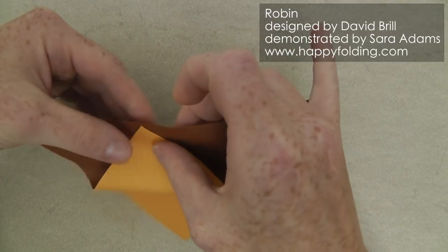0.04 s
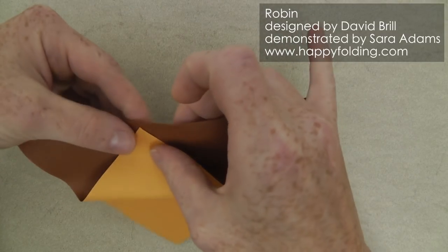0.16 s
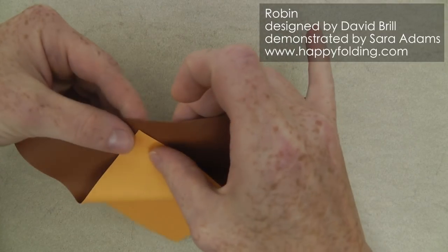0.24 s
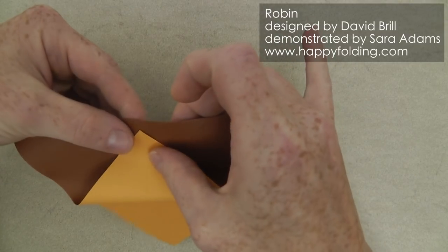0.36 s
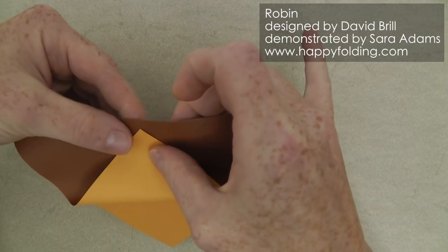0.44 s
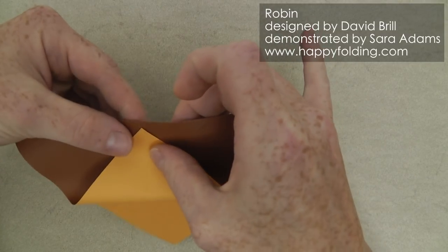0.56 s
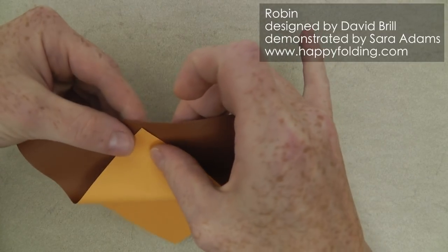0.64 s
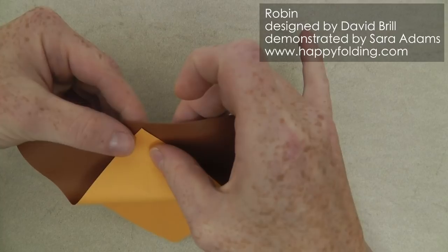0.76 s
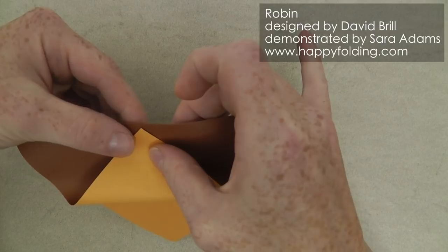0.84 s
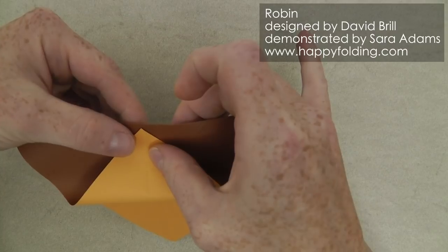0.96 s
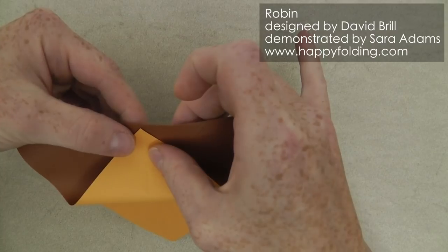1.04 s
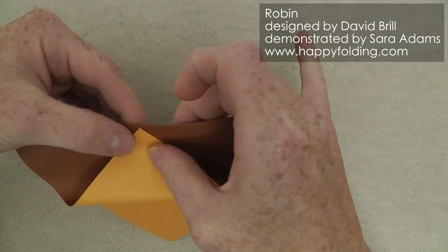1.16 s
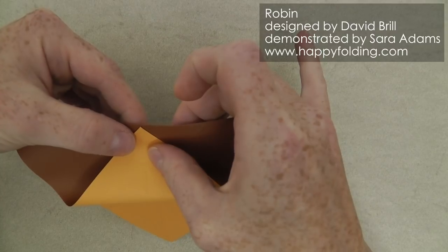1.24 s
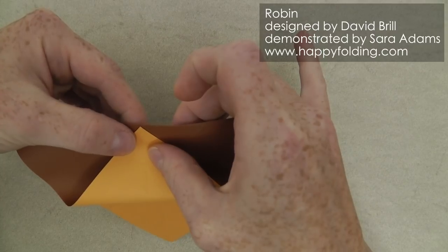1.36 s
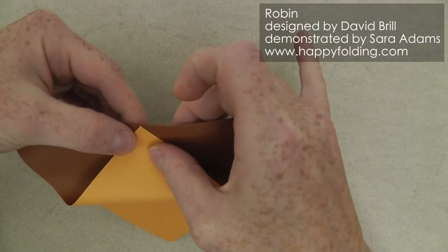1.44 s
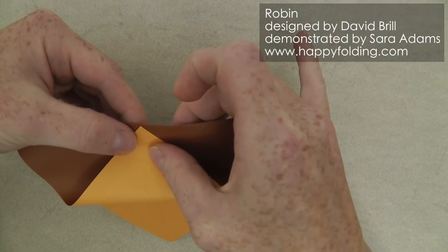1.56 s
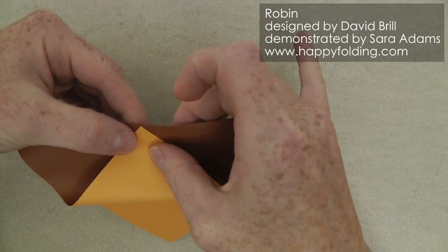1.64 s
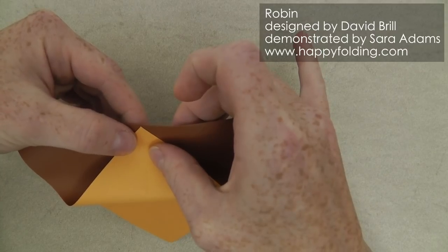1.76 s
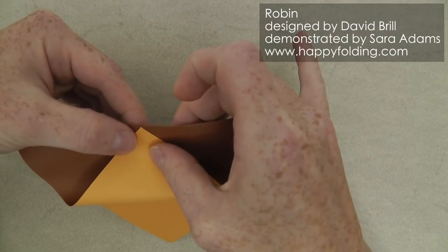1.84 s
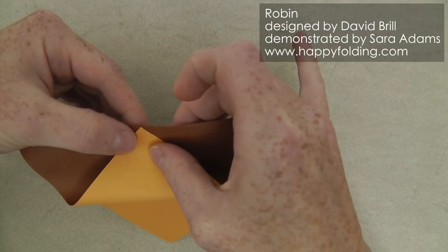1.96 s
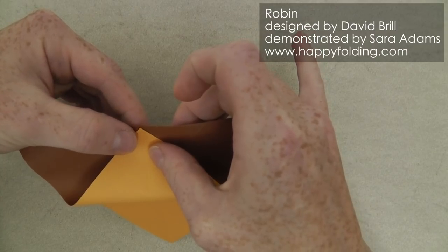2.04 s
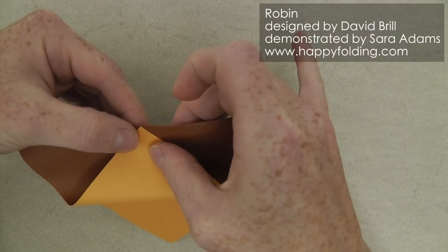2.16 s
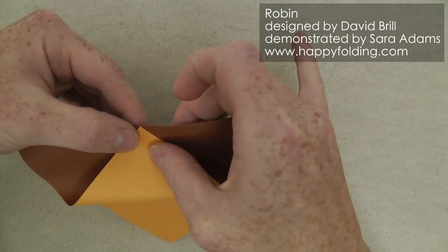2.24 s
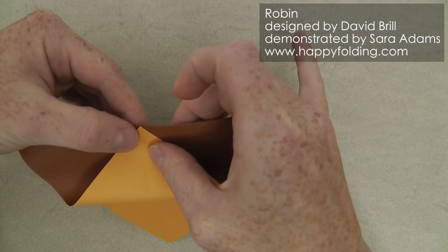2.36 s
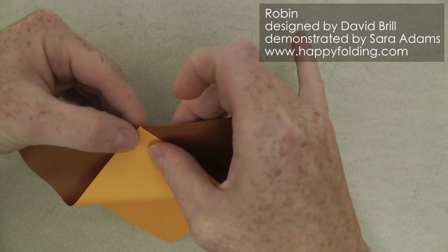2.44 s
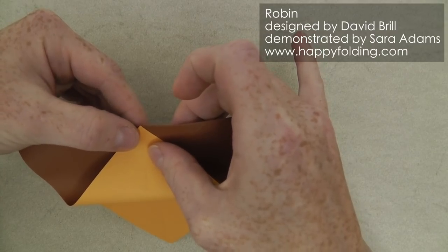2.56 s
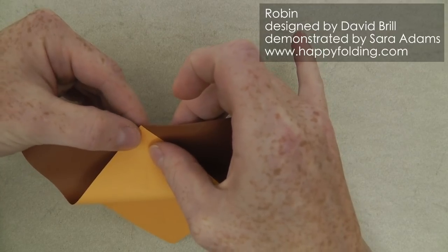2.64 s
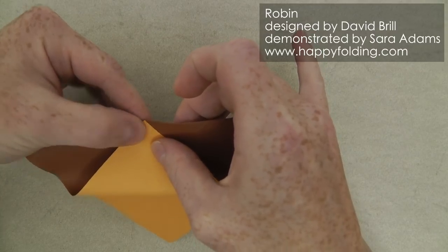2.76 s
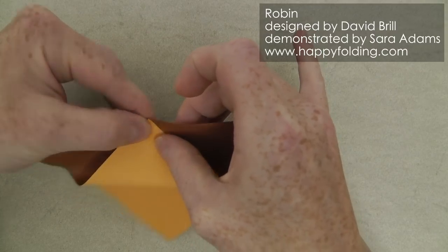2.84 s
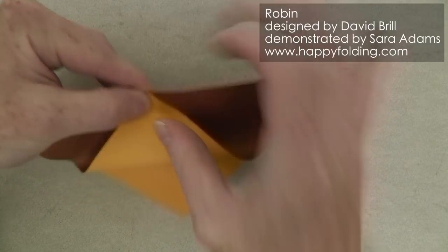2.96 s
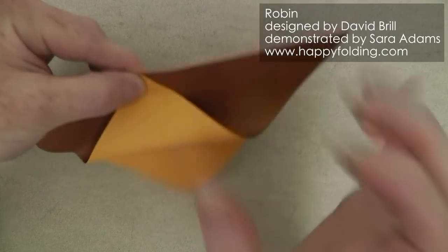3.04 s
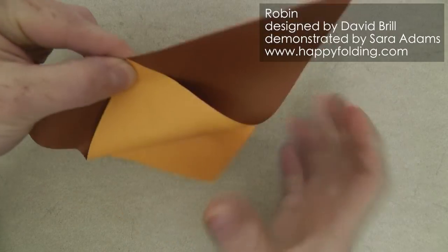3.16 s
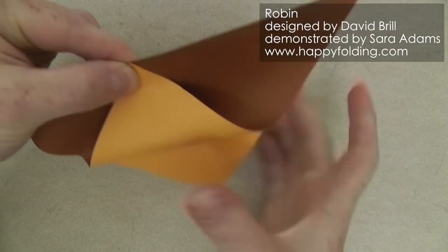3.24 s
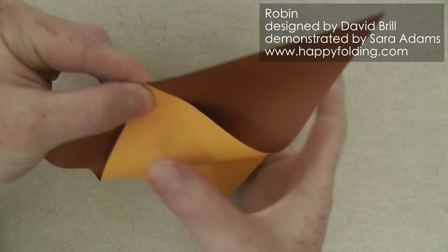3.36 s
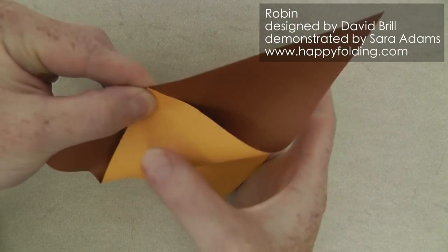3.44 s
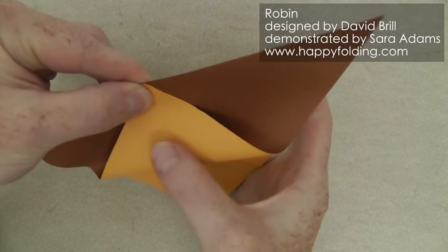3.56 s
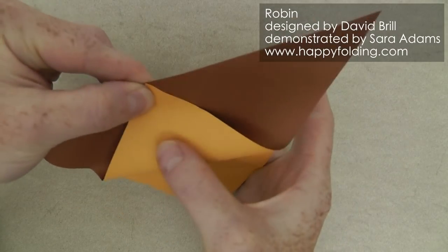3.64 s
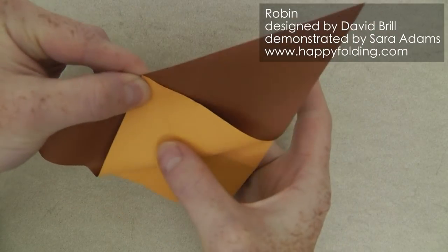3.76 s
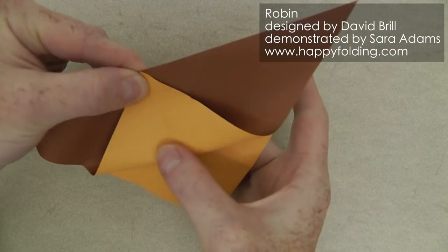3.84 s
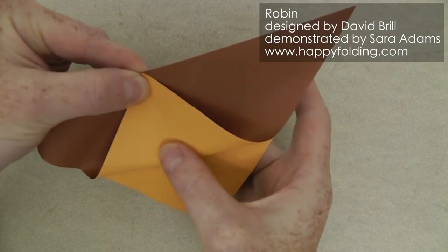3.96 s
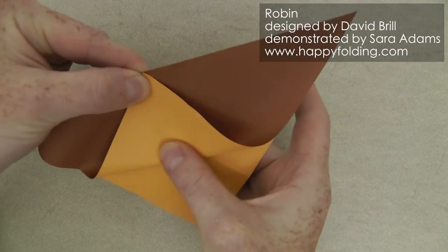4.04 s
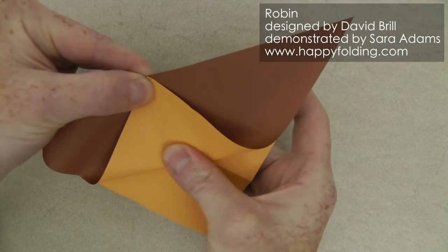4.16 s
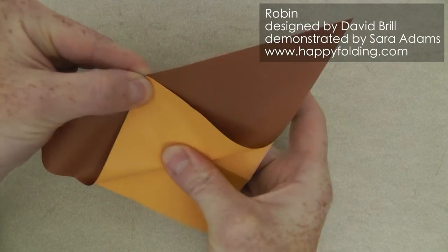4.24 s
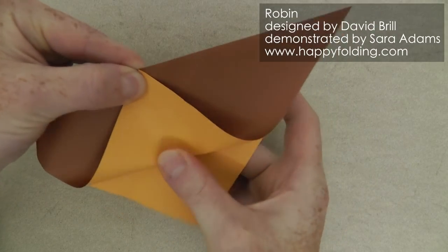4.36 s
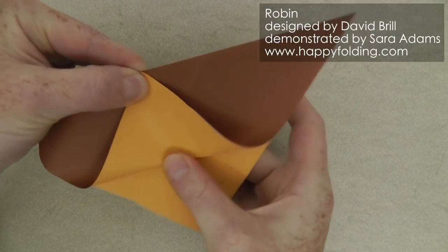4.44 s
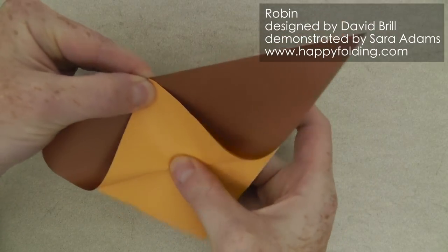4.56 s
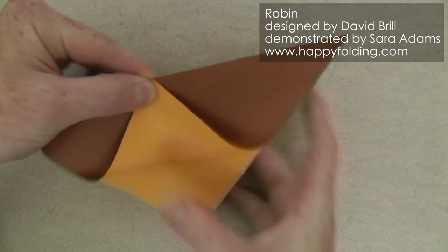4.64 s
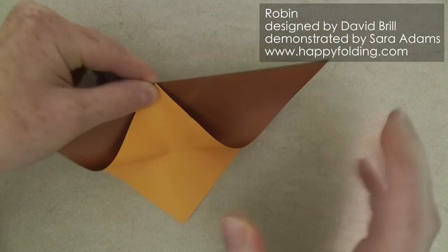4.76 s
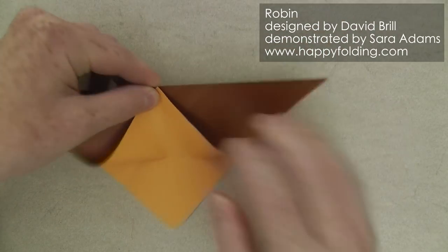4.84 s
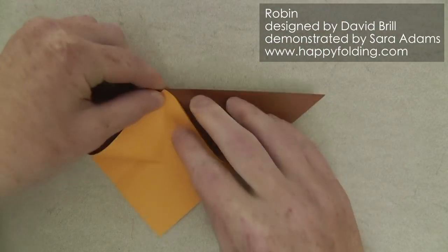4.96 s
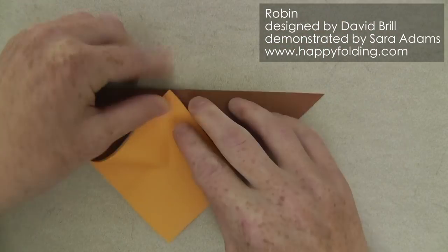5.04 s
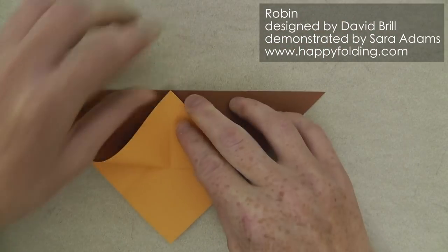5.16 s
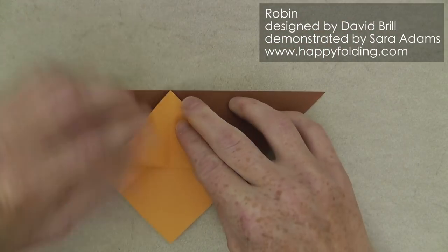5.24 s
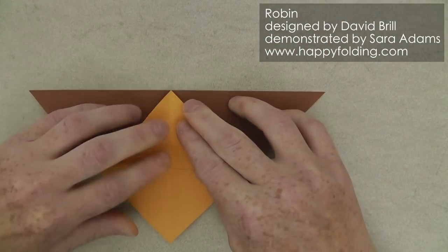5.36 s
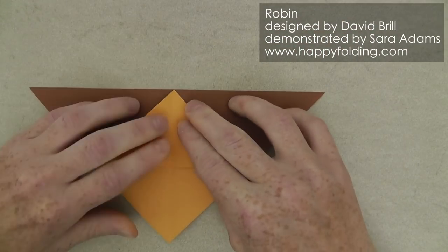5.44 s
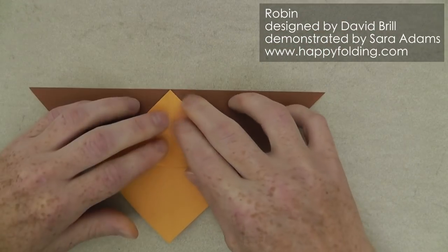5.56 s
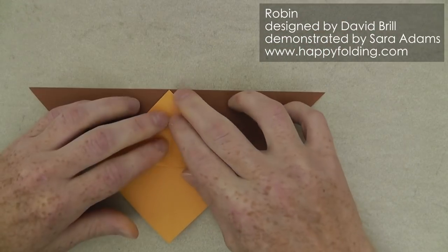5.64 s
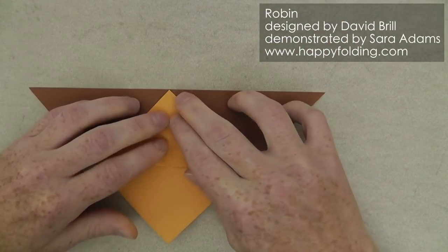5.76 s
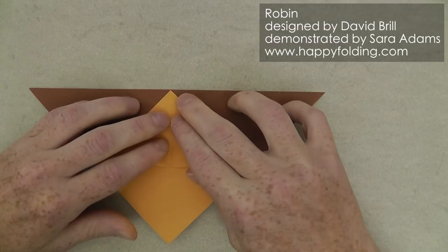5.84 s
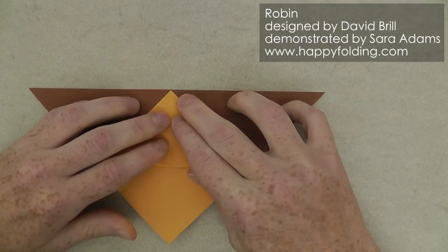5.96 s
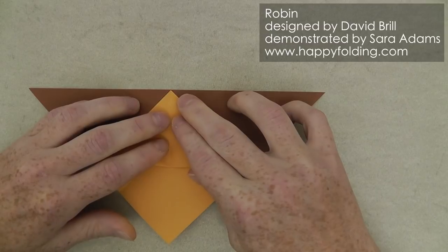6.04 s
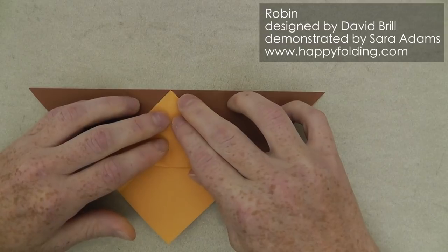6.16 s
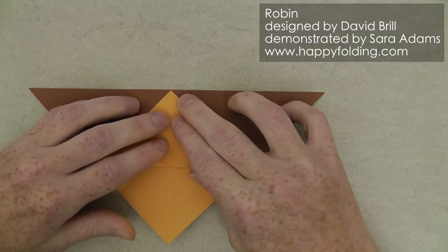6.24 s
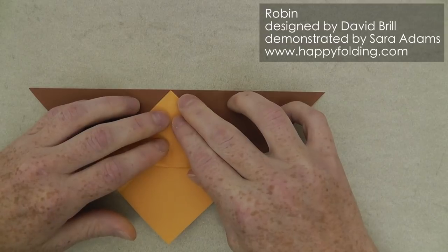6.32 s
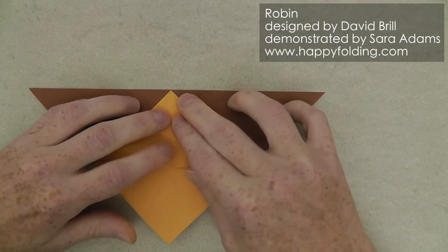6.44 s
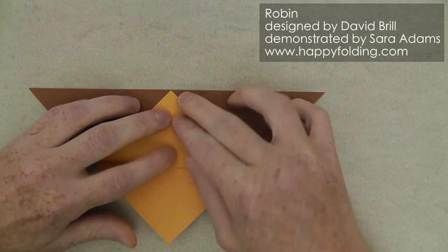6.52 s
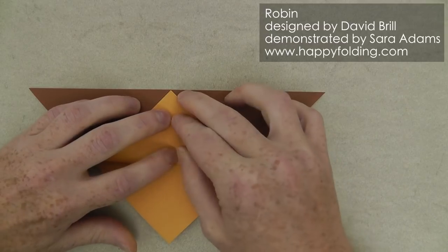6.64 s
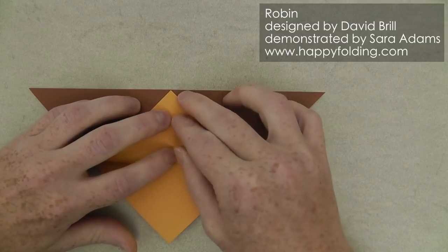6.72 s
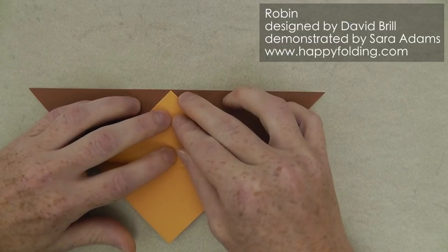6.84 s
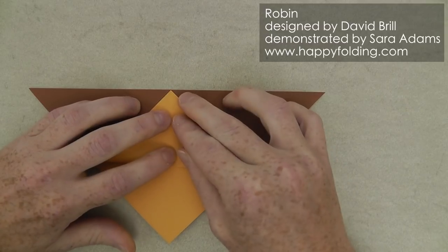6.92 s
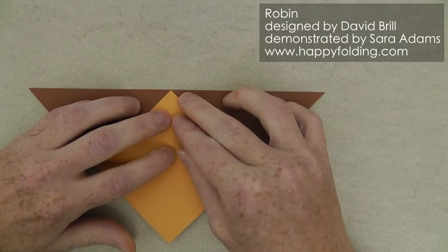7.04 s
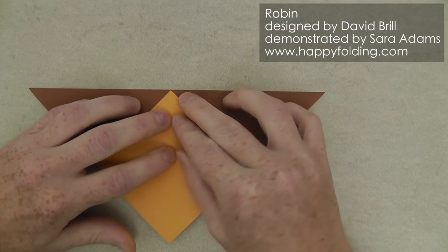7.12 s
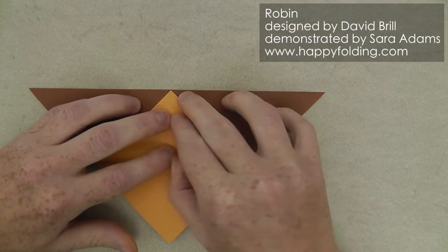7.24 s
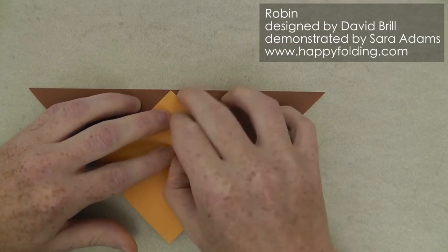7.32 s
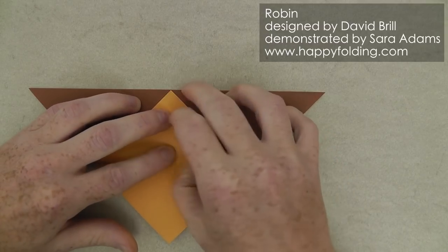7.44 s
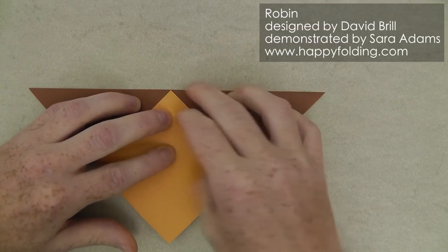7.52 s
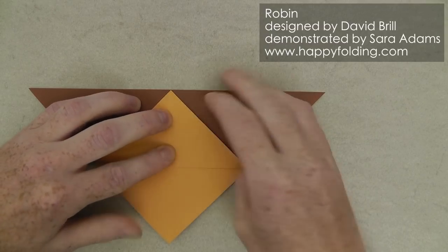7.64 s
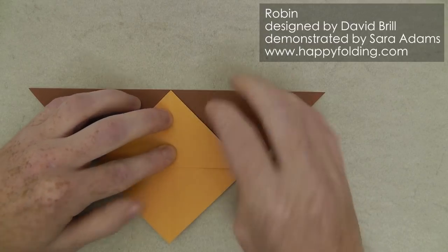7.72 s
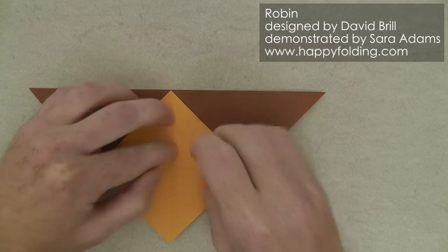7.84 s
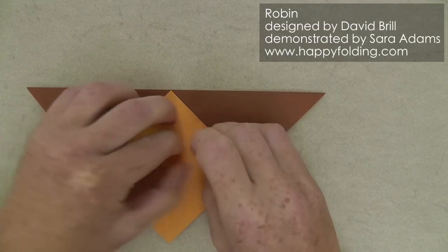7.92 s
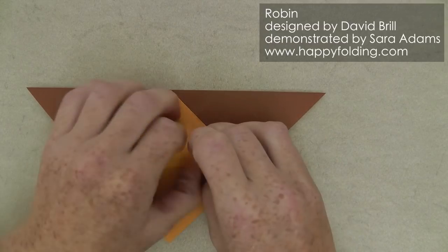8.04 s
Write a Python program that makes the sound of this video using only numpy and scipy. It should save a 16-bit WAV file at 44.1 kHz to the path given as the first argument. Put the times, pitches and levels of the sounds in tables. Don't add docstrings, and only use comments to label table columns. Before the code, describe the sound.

Hands fold a sheet of paper on a hollow table in a small room, heard very close. Light crackles and small rubs come first, then a quiet lull, then rustling, taps and a crackling crease. The loudest snaps come just past the middle as the sheet is swung and laid flat. Soft rubbing follows, ending with a brief finger judder, thud and knocks over constant hiss and hum.

```python
import sys
import numpy as np
from scipy import signal
from scipy.fft import rfft, irfft, next_fast_len
from scipy.io import wavfile
from scipy.ndimage import uniform_filter1d

SR = 44100
rng = np.random.default_rng(int(sys.argv[2]) if len(sys.argv) > 2 else 0)


def volts(x):
    e = np.asarray(x, float) / 20
    return 10 ** e


def wrap_up_sound(samples):
    columns = np.atleast_2d(samples).T
    tamed = np.clip(columns, -1, 1)
    steps = np.round(tamed * 32767).astype(np.int16)
    wavfile.write(sys.argv[1], SR, steps)


N = 356636
T = np.arange(N) / SR

# start in seconds, crack level in dB, crack pitch in Hz,
# panel ring in Hz, ring over crack in dB.
CRISP = [(.0605, -47.5, 4100, 1400, 12), (.5641, -29.5, 3360, 1000, -1), (.5676, -33, 2890, 1670, -2),
         (1.2832, -41, 3550, 2100, -4), (1.2862, -40, 3440, 2090, -2), (1.9026, -40, 3000, 1280, 5.5),
         (2.7786, -47.5, 3940, 1510, 8), (3.0055, -32.5, 3300, 1500, 8.5), (3.2765, -38, 2750, 711, -6),
         (3.5915, -31.5, 2950, 820, -2), (4.4224, -24.5, 3500, 1110, 5.5), (4.4513, -44, 4840, 770, -9),
         (4.4560, -25, 5040, 533, -3), (4.5183, -23.5, 4670, 1000, 6.5), (4.5654, -38, 4400, 1090, 5),
         (4.7025, -41, 4710, 1040, 4), (4.7064, -27, 4600, 900, 7), (4.7099, -18, 3640, 840, 1),
         (4.7336, -21.5, 4530, 900, -6), (4.786, -31, 3160, 996, -5), (5.4498, -31.5, 4730, 1280, -8),
         (6.5353, -42.5, 2830, 1270, 2), (7.9603, -35, 4400, 2100, -2), (7.9636, -27.5, 3380, 700, -5),
         (8.070, -44, 5040, 600, -9), (8.0785, -38.5, 4670, 700, -6)]
CRISP_TICK_DB, CRISP_TOP_HZ, CRISP_TEAR_S = -1.5, 12700, 0.016
# start in seconds, crack level in dB, crack pitch in Hz,
# panel ring in Hz, ring over crack in dB.
DULL = [(.0183, -28, 3600, 1040, 3.5), (.0227, -39, 2740, 969, 0), (.0288, -44, 2800, 1330, 3),
        (.0327, -23.5, 4040, 1560, 4), (.0445, -38, 3270, 970, 4), (.8273, -42, 2740, 2080, 2),
        (2.0756, -42, 2900, 1950, 7), (2.8727, -39.5, 2870, 1110, 7.5), (3.5476, -43, 3000, 1490, 7),
        (4.1953, -41, 3550, 1320, 18.5), (4.4115, -51, 3250, 900, 10), (4.4265, -45, 3670, 1190, 16),
        (4.4304, -32.5, 3500, 1500, 14), (4.5095, -50, 3500, 1000, 10), (4.5691, -43, 3750, 1100, 17),
        (4.5798, -25, 3470, 1094, 15), (4.5902, -46, 2790, 755, 8), (4.738, -36.5, 3900, 1090, 13),
        (4.7425, -33, 2700, 1300, 7), (4.7568, -41, 2680, 1160, 12), (5.0066, -38, 2900, 1005, 5.5),
        (5.5385, -45.5, 3450, 1090, 4), (5.5894, -39.5, 2820, 1080, -4), (5.829, -27.5, 4500, 1510, 8.5),
        (6.5782, -41, 2900, 1590, -1)]
DULL_TICK_DB, DULL_TOP_HZ, DULL_TEAR_S = -14, 8400, 0.022
# start in seconds, crack level in dB, crack pitch in Hz,
# tick over crack in dB.
CRACKLE = [(0.0959, -44, 3640, -15), (0.1023, -42, 2900, -17), (0.1129, -43, 2730, -15),
           (0.1356, -42, 2900, -16), (0.198, -42, 3000, -14), (0.2027, -34, 3324, -13),
           (0.4514, -66, 3450, -13), (0.498, -51, 3310, -17), (0.5104, -42, 2890, -16),
           (3.7365, -38, 4030, -6), (3.7392, -36, 3440, -4), (3.7553, -30.5, 3500, -17),
           (3.774, -26.5, 3430, -6), (3.7931, -23, 3470, -14), (3.8104, -29.5, 3470, -13),
           (3.8157, -31, 3530, -13), (3.8551, -26.5, 3450, -5.5), (3.8738, -27.5, 3470, -2.5),
           (3.892, -29.5, 3360, -3), (3.9409, -34.5, 3460, -13), (3.9613, -44, 4170, -16),
           (3.9761, -36, 4560, -9), (4.8758, -40, 3500, -10), (4.9606, -39, 3330, -5),
           (5.076, -19, 3360, -8.5), (5.1063, -34, 3360, -1), (5.1294, -12.5, 4400, -7),
           (5.1353, -22, 4200, 1), (5.1418, -17, 3280, -15), (5.1473, -15.5, 4040, -3),
           (5.151, -23.5, 4300, 4.5), (5.1529, -17.5, 3310, -10), (5.1779, -24, 4560, -14),
           (5.667, -37, 4870, -26), (6.8456, -52, 3370, -15)]
CREASE_HZ = 1110
CREASE_RING_DB, CREASE_RING_SLOPE = -3.5, -0.3
HUSH_DB = -5.5
CREASE_TEAR_S, CREASE_TEAR_SLOPE = 0.027, -0.27
BREAK = 8.5

JUDDER_S, STICK_S, STICK_SWELL_S, STICK_SKEW = 7.4894, 0.0074, 0.0021, 1.34
SLIP_DB, SLIP_GROWTH_DB, ROCK_DB, SLIPS_PER_ROCK = -38, 12.5, 2.5, 3.05
SLIP_RING_HZ, SLIP_RING_T60_S, SLIP_RING_DB = 1460, 0.012, -10

# time full level is reached in seconds, rise before it and fall
# after the hold over 20 dB in seconds, level in dB, hold in seconds.
SLIDES = [
    (.03, 0.055, 0.091, -53, 0.086),
    (.205, 0.14, 0.039, -46.5, 0.11),
    (3.074, .1, 0.073, -54.5, 0.089),
    (3.293, .023, 0.12, -56, 0.067),
    (4.394, 0.032, .1, -56.5, 0.12),
    (4.73, .03, .3, -50.5, 0.072),
    (4.903, 0.11, 0.054, -44, 0.075),
    (5.001, .05, .1, -50.5, 0.081),
    (7.62, .05, 0.12, -60, 0.28),
]
# peak time, rise and fall over 20 dB in seconds, level in
# dB.
STROKES = [(.549, 0.15, 0.084, -48), (.887, 0.032, 0.055, -50.5), (1.156, 0.18, 0.11, -62.5),
           (2.688, 0.019, 0.084, -56.5), (2.986, 0.28, .1, -54.5), (3.041, 0.078, 0.1, -45),
           (3.792, 0.077, .2, -50.5), (3.832, 0.11, 0.019, -44.5), (3.905, 0.038, 0.076, -45.5),
           (4.565, 0.21, 0.11, -53), (5.158, 0.092, 0.074, -38), (5.227, .05, 0.22, -55),
           (5.525, 0.3, 0.12, -59.5), (5.841, 0.036, 0.15, -57.5), (7.249, .015, 0.2, -53.5),
           (7.571, 0.095, 0.081, -44.5), (8.087, 0.11, .1, -51.5)]
# peak time and fall over 20 dB in seconds, level in dB.
DABS = [(.379, 0.027, -52), (0.716, 0.022, -49), (0.828, 0.035, -52), (1.288, 0.012, -42),
        (1.557, .055, -60.5), (1.912, 0.015, -47.5), (3.004, 0.061, -42), (3.501, 0.081, -58),
        (3.606, 0.032, -45.5), (4.098, .02, -62.5), (4.707, 0.062, -40), (5.611, 0.22, -54.5),
        (5.673, 0.065, -43), (6.534, 0.021, -50.5), (7.965, 0.033, -42)]
DAB_RISE_S = 0.018
# peak time, rise and fall over 20 dB in seconds, level in dB.
SKIMS = [(.22, 0.14, 0.35, -64), (1.913, 0.016, 0.0094, -49), (3.041, 0.059, .036, -39.5),
         (3.15, 0.18, 0.08, -49), (3.2875, .002, 0.0069, -35.5), (3.293, 0.025, 0.36, -56),
         (3.911, 0.064, 0.063, -45), (4.394, 0.033, 0.3, -53), (4.565, .075, 0.027, -47),
         (4.707, 0.007, 0.021, -27.5), (4.805, 0.091, 0.02, -35), (4.967, 0.056, 0.069, -40.5),
         (5.05, 0.08, 0.22, -50.5), (5.32, 0.27, 0.099, -53.5), (5.682, 0.072, 0.052, -47.5),
         (6.69, 0.15, 0.13, -58.5), (7.261, 0.038, 0.066, -49.5), (7.6, 0.16, 0.14, -40),
         (7.81, 0.015, 0.031, -34), (7.922, 0.022, .025, -44), (7.964, .008, 0.019, -34)]
# peak time, rise and fall over 20 dB in seconds, level in dB.
FLAPS = [(.032, 0.037, 0.2, -46.5), (.887, 0.018, 0.062, -53), (2.688, 0.032, 0.18, -59.5),
         (2.869, 0.1, 0.48, -57), (3.15, 0.53, 0.095, -52.5), (3.293, 0.026, 0.19, -54.5),
         (3.608, 0.033, 0.049, -49.5), (3.792, 0.039, 0.069, -46.5), (4.204, 0.025, 0.089, -51.5),
         (4.423, 0.058, 0.32, -50.5), (4.614, 0.55, 0.082, -52.5), (4.707, 0.0049, 0.094, -30.5),
         (4.863, 0.35, 0.097, -51), (4.967, 0.057, 0.17, -49), (5.158, 0.11, 0.12, -42.5),
         (5.381, 1, 0.49, -57), (5.841, 0.012, 0.095, -45.5), (7.435, .01, .3, -55),
         (7.56, 0.11, 0.12, -41), (7.62, .05, 0.77, -51.5), (7.964, 0.017, 0.095, -46.5),
         (8.087, 0.036, 0.11, -41.5)]
SLIDE_FIZZ_DB, SLIDE_FLUTTER_DB = -5.5, -7.5
# frequency in Hz, level in dB per Hz.
RUB_BODY = [(1300, -33), (2500, -3.5), (2870, 0), (3450, 0.5), (4000, -4.5), (4560, -3), (5400, -9.5),
            (10500, -27)]
# frequency in Hz, level in dB per Hz.
FIZZ = [(3600, -22), (6200, -3.5), (7500, 0), (10000, -4.5), (14000, -10.5), (16200, -15)]
# frequency in Hz, level in dB per Hz.
FLUTTER = [(250, -11), (600, -4.5), (1100, 3), (1600, 3.5), (2300, -4.5), (4000, -40)]
PINNED_S, PINNED_RISE = 5.2, 1.205
# pitch in Hz, ring t60 in seconds.
SHEET = [(2870, 0.015), (3450, .014), (3900, .008), (4500, 0.0095)]
PLUCKS_PER_S, PLUCK_SPREAD_DB, PLUCK_SHARE = 260, 4, 0.71
# start in seconds, level in dB.
SCUFFS = [(0.1593, -40), (0.4753, -57), (0.594, -40), (0.6492, -42.5), (0.7056, -43.5), (0.735, -45),
          (0.9355, -45), (1.1091, -43), (1.3513, -50.5), (1.3962, -48), (2.6836, -50), (3.2866, -40),
          (3.494, -45.5), (3.908, -36), (5.468, -41.5), (5.5206, -43), (5.5647, -47), (5.6092, -43.5),
          (5.783, -44), (5.967, -49.5), (5.9953, -50), (6.4935, -47), (6.6916, -48.5), (7.241, -57),
          (7.297, -51)]

# start in seconds, level in dB, hardness in dB per octave.
KNOCKS = [(3.171, -33, 8), (3.2755, -23.5, 10), (3.588, -35.5, 3), (4.162, -33.5, 3.5), (4.1925, -29, 19),
          (4.421, -43, -24), (4.575, -25.5, 4), (4.704, -26.5, -4), (5.062, -31.5, -10), (5.984, -41.5, -1),
          (7.273, -38.5, 1), (7.388, -38.5, -5.5), (7.427, -42, 15), (7.963, -21, -1), (8.075, -23.5, 2)]
# start in seconds, level in dB, hardness in dB per octave.
LANDING = (7.591, -25, -13)
# pitch in Hz, level in dB, ring t60 in seconds.
TABLE = [(120.1, -10.5, 0.66), (137.6, -4, 0.25), (217.7, -0.5, 0.2), (282.5, 2.5, 0.094),
         (341, -1.5, 0.052), (421, 2, 0.086), (462, -2, 0.057), (585, -9.5, 0.057), (743, -7.5, 0.048),
         (797, -39, 0.18)]
# peak time, rise and fall over 20 dB in seconds, level in dB.
PRESSES = [(2.9, 0.55, 3.4, -48.5), (3.284, 0.0067, 0.084, -21.5), (3.33, 0.046, .1, -32),
           (3.75, 1, 1.1, -48), (4.43, 0.061, 0.21, -39), (4.71, 0.034, 0.22, -33.5),
           (5.05, 0.65, .3, -42.5), (5.08, .065, 0.55, -36.5), (5.3, .3, 1.1, -44.5), (5.8, .3, 4, -62),
           (7.51, 0.031, 0.24, -27), (7.58, 0.14, .06, -25.5), (7.7, .1, 1.2, -43), (7.98, 0.13, 0.2, -37),
           (8.09, 0.034, .1, -27.5)]

# start in seconds, level in dB.
PUFFS = [
    (3.02, -47),
    (3.27, -47),
    (4.19, -56),
    (4.703, -32),
    (5.12, -44),
    (7.96, -41),
]
PUFF_HZ, PUFF_T60_S, PUFF_RIGHT = 42, 0.11, -0.5

# frequency in Hz, level in dB.
SPREAD = [(60, -4), (120, -5.5), (700, 0), (2400, -4), (4400, -25), (6500, -28), (8500, -1), (15000, 1)]
# frequency in Hz, t60 in seconds.
ROOM = [(100, 0.14), (500, 0.25), (1500, 0.17), (4000, 0.18), (12000, 0.13)]
# frequency in Hz, level in dB per Hz.
HUM = [(30, -51), (47, -9.5), (65, -27), (114, 2), (170, -16.5), (205, -8), (350, -18.5)]
# frequency in Hz, level in dB per Hz.
FUZZ = [(930, -25), (1400, -23.5), (2750, -27), (3500, -31), (5500, -34.5), (6250, -29), (7200, -32),
        (15200, -33.5)]
# frequency in Hz, level in dB per Hz.
APART = [(25, -11), (146, 3.5), (651, -3.5), (1880, -12.5), (3320, -26.5), (4240, -75), (8600, -40),
         (14000, -27.5)]
FLOOR_DB, APART_DB = -59, -60
# pitch in Hz, level in dB rms.
WHINE = [(1362, -79), (1385, -87), (1812.7, -78.5), (1862.7, -78.5), (1912.7, -78), (2723, -86)]
# centre in Hz, width in Hz, gain in dB.
NOTCHES = [(1780, 140, -25), (2397, 220, -33), (3080, 175, -13)]


def evened(x):
    return x / np.sqrt(np.mean(x ** 2) + 1e-20)


def read(points, hz):
    f, value = np.transpose(points)
    return np.interp(np.log(hz + 1), np.log(f + 1), value)


def colour(x, points):
    size = next_fast_len(len(x))
    gain = volts(read(points, np.fft.rfftfreq(size, 1 / SR)))
    return irfft(rfft(x, size) * gain, size)[:len(x)]


def filtered(x, order, hz, kind):
    return signal.sosfilt(signal.butter(order, hz, kind, fs=SR, output="sos"), x)


def add(mix, s, sound):
    part = mix[..., round(s * SR):][..., :sound.shape[-1]]
    part += sound[..., :part.shape[-1]]


def drift(seconds):
    size = max(round(seconds * SR), 2)
    once = uniform_filter1d(rng.standard_normal(N), size)
    return evened(uniform_filter1d(once, size))


def ring(t, hz, t60):
    return np.sin(2 * np.pi * hz * t) * volts(-60 * t / t60)


def gestures(rows):
    t = T[::32]
    level = np.full(len(t), -120.)
    for s, rise, fall, db, *hold in rows:
        before = (s - t) / max(rise, 0.002)
        after = (t - s - sum(hold)) / max(fall, 0.002)
        away = np.maximum(before, after)
        level = np.maximum(level, db - 20 * np.maximum(away, 0))
    return np.interp(T, t, level)


def buckles():
    rows = [(*row, CRISP_TICK_DB, CRISP_TOP_HZ, CRISP_TEAR_S) for row in CRISP]
    rows += [(*row, DULL_TICK_DB, DULL_TOP_HZ, DULL_TEAR_S) for row in DULL]
    for s, db, hz, tick_db in CRACKLE:
        ring_db = min(CREASE_RING_DB + CREASE_RING_SLOPE * (db + 33), HUSH_DB)
        tear = CREASE_TEAR_S * volts(CREASE_TEAR_SLOPE * (db + 32))
        rows.append((s, db, hz, CREASE_HZ, ring_db, tick_db, CRISP_TOP_HZ, tear))
    return sorted(rows)


def judder(count=12):
    k = np.arange(count)
    stick = STICK_S + STICK_SWELL_S * np.sin(np.pi * ((k + 0.5) / (count - 1)) ** STICK_SKEW)
    rock = ROCK_DB * np.cos(2 * np.pi * (k - 1) / SLIPS_PER_ROCK)
    db = SLIP_DB + SLIP_GROWTH_DB * k / count + rock
    return np.c_[JUDDER_S + np.cumsum(stick) - stick, db]


def snaps():
    out, t = np.zeros(N), np.arange(4096) / SR
    for s, db, crack_hz, hz, ring_db, tick_db, top_hz, tear in buckles():
        tearing = volts(-60 * t / 0.0075) + 0.5 * volts(-60 * (t / max(tear, 0.003)) ** 1.23)
        burst = rng.standard_normal(len(t)) * tearing
        tick = filtered(burst + 3 * (t == 0), 3, [5600, top_hz], "band")
        burst[:2] += [BREAK, -0.4 * BREAK]
        crack = filtered(burst, 2, [0.84 * crack_hz, 1.35 * crack_hz], "band")
        crack += 0.1 * signal.oaconvolve(burst, ring(t[:400], crack_hz, 0.0072))[:len(t)]
        panel = ring(t, hz, 0.02) + 0.21 * ring(t, hz * 0.92, 0.035)
        panel += 0.31 * ring(t, hz * (0.36 + 0.065 * rng.random()), 0.013)
        panel = signal.oaconvolve(panel, burst[:90])[:len(t)]
        panel += 18 * filtered(burst, 3, [450, 2750], "band")
        sound = volts(db) * crack / abs(crack).max()
        sound += volts(db + tick_db) * tick / abs(tick).max()
        sound -= volts(db + ring_db) * panel / abs(panel).max()
        add(out, s, sound)
    for s, db in judder():
        add(out, s + 0.0031, volts(db + SLIP_RING_DB) * ring(t, SLIP_RING_HZ, SLIP_RING_T60_S))
    return out


def grit(per_s, spread_db, smooth):
    clicks = rng.standard_normal(N) * volts(spread_db * np.minimum(rng.exponential(1, N), 4))
    clicks *= rng.random(N) < per_s / SR
    waver = volts(1.6 * drift(0.004))
    return waver * (evened(clicks) + smooth * rng.standard_normal(N))


def plucks():
    t, out = np.arange(800) / SR, np.zeros(N)
    for hz, t60 in SHEET:
        size = volts(PLUCK_SPREAD_DB * np.minimum(rng.exponential(1, N), 3))
        size *= rng.random(N) < PLUCKS_PER_S / SR
        panel = ring(t, hz, t60) * np.minimum(t / 0.00073, 1)
        out += signal.oaconvolve(size, panel)[:N]
    return evened(out)


def sticking():
    at = judder()[:, 0]
    since = T - at[np.maximum(np.searchsorted(at, T) - 1, 0)]
    stuck = 1 / (1 + np.exp(np.clip((0.005 - since) / 0.00095, -30, 30)))
    return np.where((T > at[0]) & (T < at[-1] + 0.006), volts(6.5 - 16 * stuck), 1)


def rub():
    dabs = [(s, DAB_RISE_S, fall, db) for s, fall, db in DABS]
    rub_db = gestures(SLIDES + STROKES + dabs)
    fizz_db = np.maximum(rub_db + SLIDE_FIZZ_DB, gestures(SKIMS))
    flutter_db = np.maximum(rub_db + SLIDE_FLUTTER_DB, gestures(FLAPS))
    slips = grit(2500, 1.44, 1.45)
    loose = evened(colour(slips, RUB_BODY))
    pinned = evened(colour(slips, np.multiply(RUB_BODY, [PINNED_RISE, 1])))
    sheet = np.where(T < PINNED_S, loose, pinned) + PLUCK_SHARE * plucks()
    body = volts(rub_db) * sheet / np.hypot(1, PLUCK_SHARE)
    fizz = volts(fizz_db - 2.6) * evened(colour(0.5 * slips + grit(4000, 3.6, 1.1), FIZZ))
    flutter = volts(flutter_db + 0.5) * evened(colour(slips + 0.48 * grit(600, 6.9, 1.0), FLUTTER))
    return volts(-1.43) * (body + fizz + flutter) * sticking()


def scuffs():
    drive, t = np.zeros(N), np.arange(2048) / SR
    for s, db in SCUFFS:
        add(drive, s, volts(db + 4.0 - 60 * t / 0.026) * rng.standard_normal(len(t)))
    return colour(drive, RUB_BODY) + volts(-16) * colour(drive, FIZZ) + volts(-3.5) * colour(drive, FLUTTER)


def table():
    t, out = np.arange(SR // 4) / SR, np.zeros(N)
    modes = [volts(db) * ring(t, hz, t60) for hz, db, t60 in TABLE]
    octaves = np.log2(np.transpose(TABLE)[0] / TABLE[0][0])
    slips = [(s, db, -2.0) for s, db in judder()]
    hits = list(KNOCKS) + [LANDING] + slips
    spots = rng.uniform(-3.5, 1, (len(hits), len(modes)))
    spots[len(KNOCKS)] = 0
    for (s, db, hard_db), spot in zip(hits, spots):
        sound = volts(hard_db * octaves + 5 * spot) @ modes
        add(out, s + 0.00225, volts(db) * sound / abs(sound).max())
    damped = sum(modes) * volts(-60 * t / 0.11)
    load = volts(gestures(PRESSES) - 8.0) * rng.standard_normal(N)
    return out + signal.oaconvolve(load, damped)[:N] / np.linalg.norm(damped)


def puffs():
    out, t = np.zeros(N), np.arange(SR // 4) / SR
    for s, db in PUFFS:
        add(out, s, volts(db) * ring(t, PUFF_HZ, PUFF_T60_S) * np.minimum(t / 0.0089, 1))
    return np.array([out, PUFF_RIGHT * out])


def ports(x):
    shifted = signal.hilbert(colour(x, SPREAD), next_fast_len(N))[:N].imag
    apart = shifted * drift(0.0096)
    return volts(-5.5) * np.array([apart, -apart])


def room(x):
    taps = np.zeros((2, SR // 2))
    at = np.arange(150, SR // 2 - 20, 20)
    at = at + rng.integers(0, 20, (2, len(at)))
    np.put_along_axis(taps, at, rng.choice([-1., 1.], at.shape), 1)
    taps[1] = 1.2 * taps[0] + 0.18 * taps[1]
    hz, t, z = signal.stft(taps, SR, nperseg=256)
    decay = volts(-60 * t / read(ROOM, hz)[:, None])
    tail = signal.istft(z * decay, SR, nperseg=256)[1]
    return signal.fftconvolve(x[None], tail / np.linalg.norm(tail[0]), axes=1)[:, :N]


def camera():
    floor = volts(FLOOR_DB) * evened(colour(rng.standard_normal(N), HUM + FUZZ))
    hum = signal.sosfiltfilt(signal.butter(2, 500, fs=SR, output="sos"), floor)
    alike = floor + (volts(1.36 * drift(0.15)) - 1) * hum
    opposite = volts(APART_DB + 0.71 * drift(0.046)) * evened(colour(rng.standard_normal(N), APART))
    return np.array([alike + opposite, alike - opposite])


def whine():
    out = np.zeros(N)
    for hz, db in WHINE:
        level = volts(db + 1.5 + 0.5 * drift(0.026))
        out += level * np.sin(2 * np.pi * (hz * T + rng.random()))
    return out


def scene():
    paper = filtered(snaps() + rub() + scuffs(), 2, 300, "high")
    board = filtered(table(), 3, 106, "high")
    near = paper * volts([[0.6], [-0.6]]) + board * volts([[-0.4], [0.4]])
    both = paper + board
    return near + ports(both) + volts(-20.0) * room(both) + camera() + puffs()


def band_limit(x):
    return signal.sosfilt(signal.butter(12, 16680, fs=SR, output="sos"), x)


def record(dry):
    for hz, width, db in NOTCHES:
        cut = signal.lfilter(*signal.iirpeak(hz, hz / width, SR), dry)
        dry = dry - (1 - volts(db)) * cut
    edge = signal.firwin(511, 16050, window=("kaiser", 9), fs=SR)
    mix = signal.oaconvolve(dry + whine(), edge[None], "same")
    return band_limit(mix)


dry = scene()
out = record(dry)
wrap_up_sound(out)
```